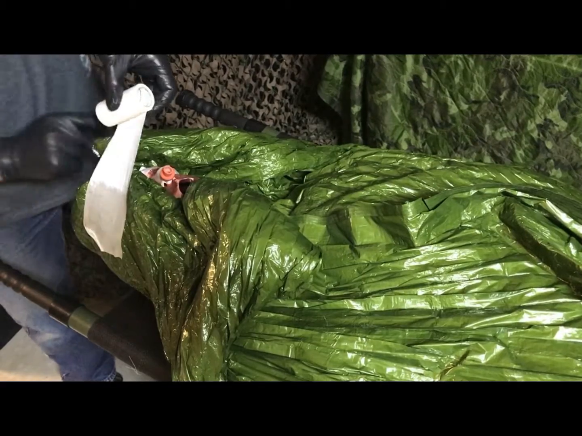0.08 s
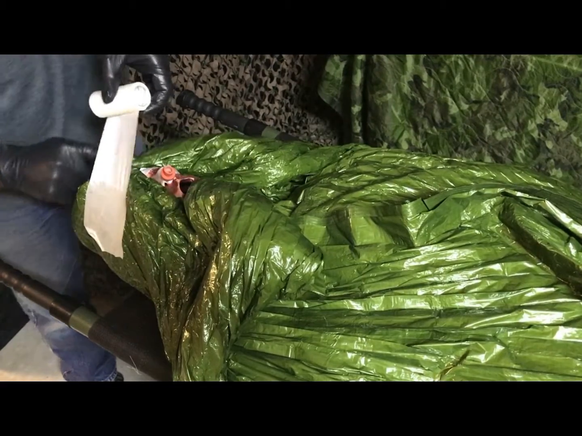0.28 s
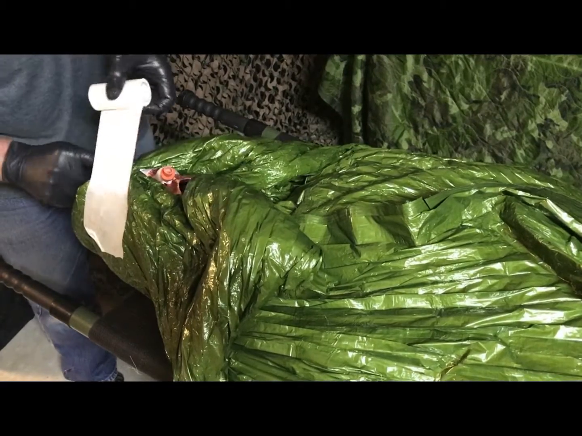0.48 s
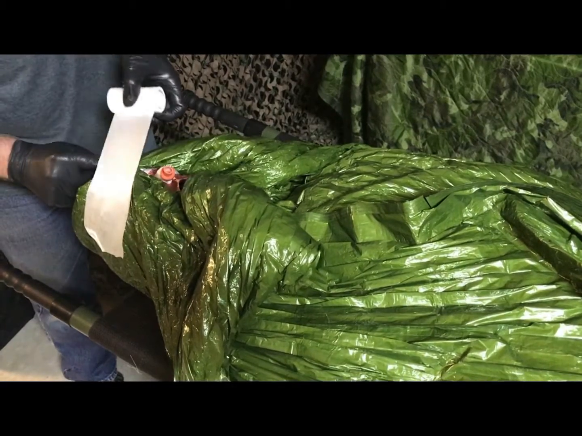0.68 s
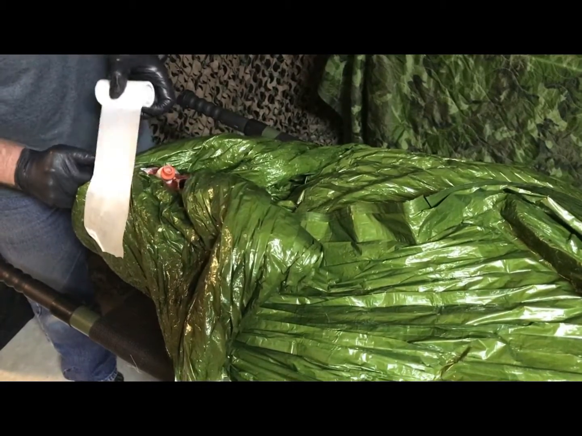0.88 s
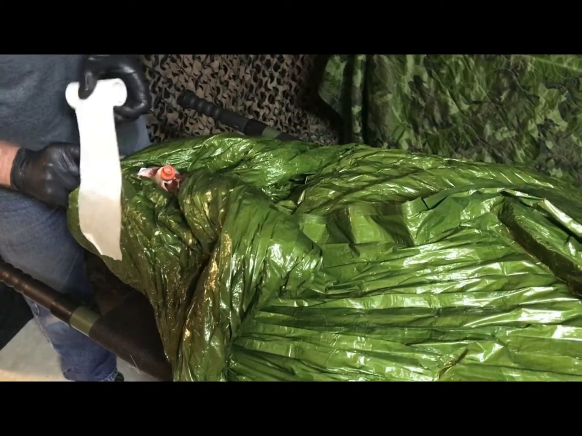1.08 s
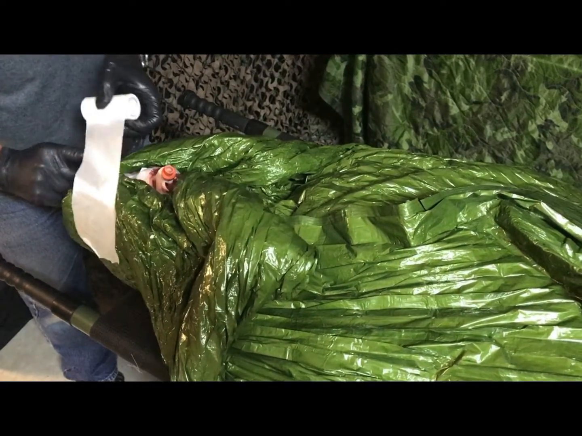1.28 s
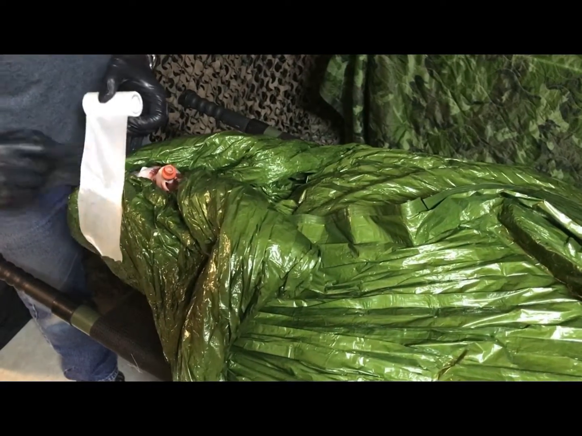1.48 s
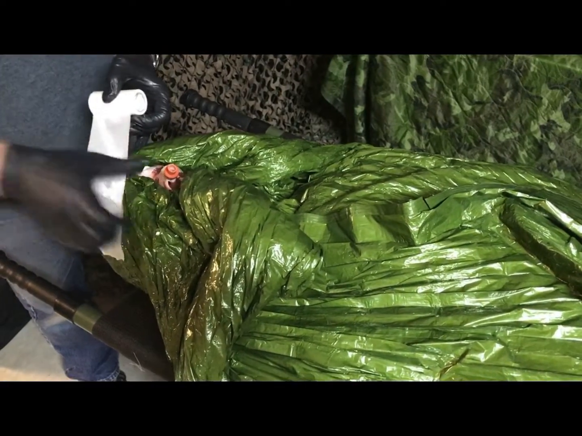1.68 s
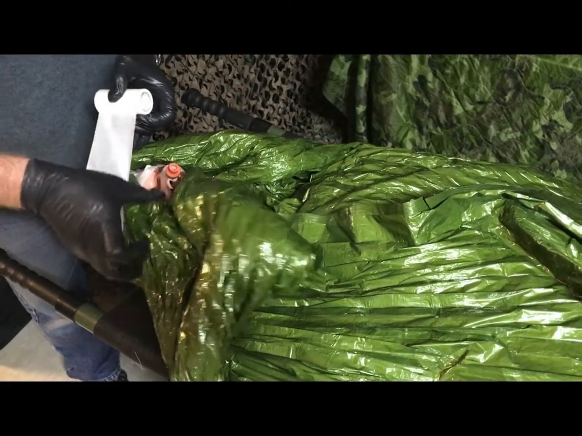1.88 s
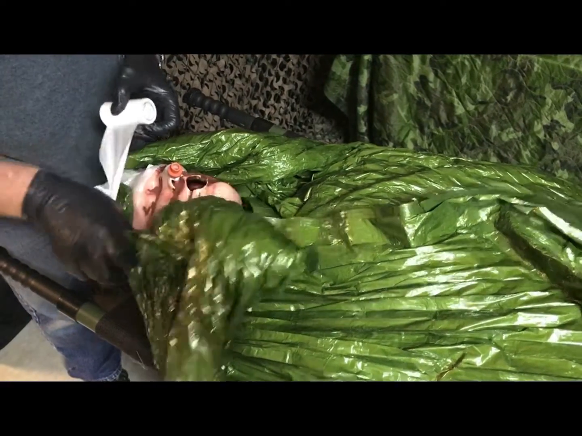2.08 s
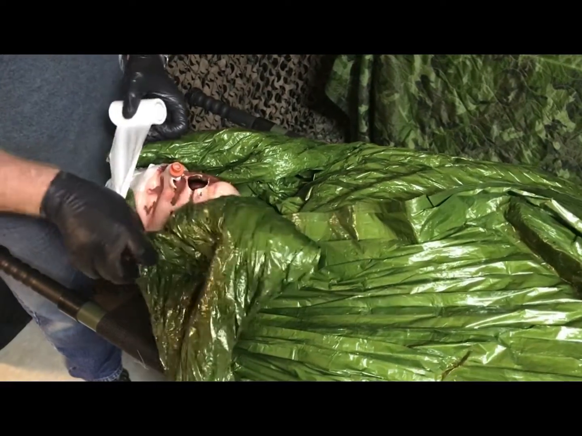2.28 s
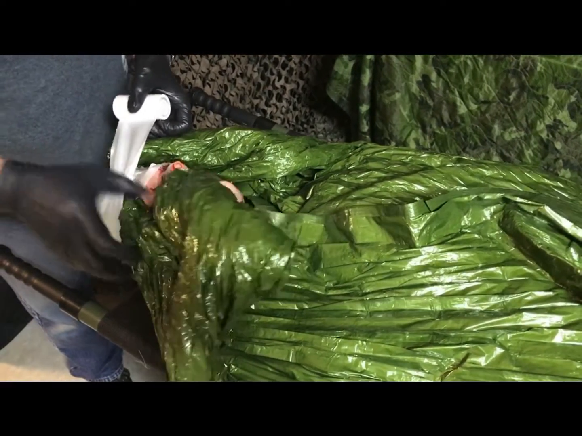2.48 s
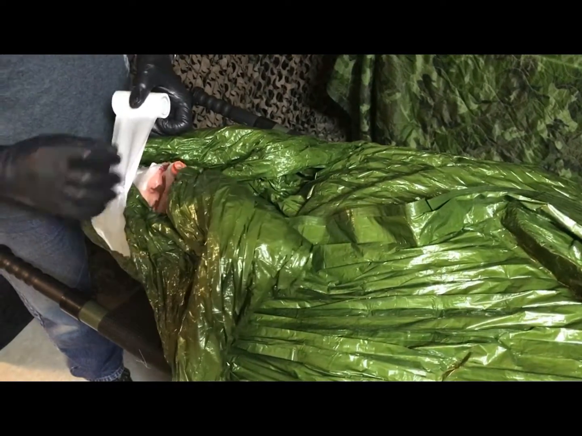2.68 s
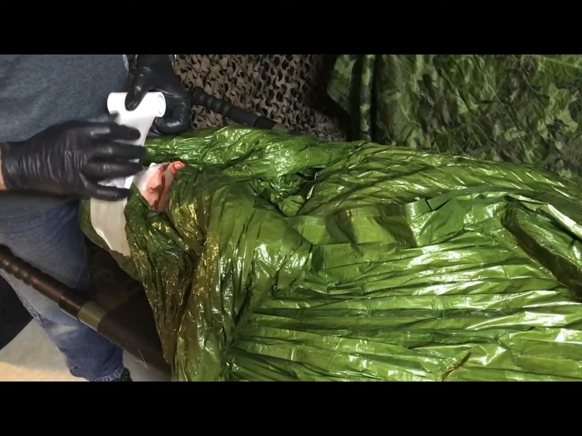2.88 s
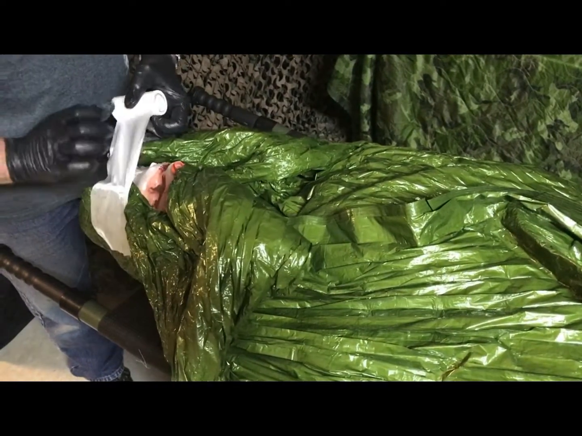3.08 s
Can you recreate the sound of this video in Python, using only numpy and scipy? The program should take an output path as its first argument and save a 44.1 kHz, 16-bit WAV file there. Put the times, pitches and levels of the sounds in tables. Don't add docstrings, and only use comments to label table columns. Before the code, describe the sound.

Crinkling foil-like plastic blanket, tugged with sharp ticks and dull pops, then peeled back loudly.

```python
import sys
import numpy as np
from scipy import signal
from scipy.io import wavfile
from scipy.ndimage import uniform_filter1d

SR = 44100
rng = np.random.default_rng(int(sys.argv[2]) if len(sys.argv) > 2 else 0)


def voltage_ratio(level):
    return 10 ** (np.asarray(level, float) / 20)


def materialize(psi):
    bounded = np.clip(np.atleast_2d(psi).T, -1, 1)
    quanta = np.round(bounded * 32767).astype(np.int16)
    wavfile.write(sys.argv[1], SR, quanta)


N = 138915

# peak_s, swell_s_per_10db, fade_s_per_10db, effort_db, large_fold_weight_db
TUG_EVENTS = [
    (.02, 3.5, 0.2, -53, -2),
    (.22, 0.0236, 0.0262, -32, -6.5),
    (.29, 0.07, 0.13, -36, -4.5),
    (.355, 0, 0.02, -35.5, 0.5),
    (.6, 0.165, 0.32, -36, -6),
    (.772, 0.05, 0.02, -37, -2.5),
    (1.0, 0.08, 0.1, -48, 5),
    (1.22, 0.08, 0.07, -39, 3),
    (1.52, 0.38, 0.04, -44.5, 2),
    (1.62, .1, 0.8, -52, -2),
]
# start_s, fade_s_per_10db, effort_db, large_fold_weight_db
JERK_EVENTS = [
    (.79, .1, -40, 4),
    (.812, .1, -40, 16),
    (1.062, .11, -43, 7),
    (1.14, .2, -39, 4),
    (1.293, .12, -39, 6),
    (1.442, .045, -38, 4),
    (1.637, .03, -47, -3),
    (2.855, .045, -45, 6),
]
# peak_s, swell_s_per_10db, fade_s_per_10db, effort_db, large_fold_weight_db
PEEL_EVENTS = [(1.798, 0.01, 0.7, -35.5, -5), (1.9, 0.05, 0.03, -31, -1.5),
               (2.06, 0.0715, 0.04, -24.5, -4.5), (2.195, 0.0624, 0.05, -28, -3.5),
               (2.265, 0.075, 0.08, -29, -4.5), (2.405, 0.1164, 0.16, -30.5, -3),
               (2.54, 0.09, -0.09, -33, -2.5), (2.598, 0.04, 0.01, -38, 2), (2.63, 0.12, 0.25, -44, -5),
               (2.79, 0.05, 0.35, -42.5, -11), (2.97, 0.05, 0.3, -45, -4)]
# start_s, peak_db, pitch_hz
CREASE_TICKS = [(.019, -30.5, 5850), (0.03, -31, 5940), (0.0483, -26, 13700), (0.133, -28, 11200),
                (0.162, -29, 7440), (0.2149, -18, 6460), (0.22, -17, 6620), (0.3357, -16, 5570),
                (.4127, -31, 12200), (.4382, -32, 11000), (.77, -18, 13300), (1.022, -28, 8130),
                (1.4187, -27, 8460), (1.6356, -26, 6430), (1.7966, -29, 12200), (1.8149, -18.5, 7230),
                (1.831, -17, 8000), (1.881, -17, 6960), (1.9367, -16.5, 6130), (2.2546, -15, 13500),
                (2.301, -18, 13500), (2.5885, -10, 7160), (2.594, -9, 6000), (2.7465, -18, 6500),
                (2.876, -19, 7500), (2.807, -27, 6500), (0.5, -33, 6970), (.7231, -21, 9140),
                (1.0376, -35, 7950), (1.521, -33, 13500), (1.5375, -31, 13100), (1.566, -37, 12500),
                (1.5911, -29, 7420), (1.593, -36, 13200), (1.63, -42, 12900), (1.673, -32.5, 9170),
                (1.681, -38, 12900), (1.6954, -36, 6540), (1.7118, -35, 5600), (1.7135, -41, 13000),
                (1.7595, -37, 11600), (1.7821, -43, 5500), (1.8608, -19.5, 6860), (1.9415, -16, 7500),
                (1.957, -16, 7900), (2.001, -17, 6850), (2.016, -14, 7640), (2.116, -15, 7540),
                (2.305, -18, 8050), (2.4001, -17.5, 6400)]
# start_s, peak_db, pitch_hz, tick_db
FOLD_POPS = [(0.131, -31, 970, -18), (0.163, -33, 2100, -3), (0.334, -22.5, 1480, -6),
             (0.788, -17.5, 1300, 2), (0.801, -16.5, 1250, -7), (0.808, -9, 1890, -4.5),
             (0.826, -5.5, 710, -7.5), (0.843, -9, 910, -7), (0.861, -6, 1344, -10.5),
             (0.886, -11, 880, -9.5), (0.929, -20.5, 1420, -20), (1.0548, -13.5, 1000, -8),
             (1.137, -17.5, 990, -9), (1.342, -20.5, 1210, -1), (1.357, -19, 1170, -5),
             (1.81, -21.5, 1530, -7), (2.196, -16.5, 2180, -10), (2.361, -18, 1070, -18),
             (2.387, -14, 1120, -6), (2.552, -17.5, 2200, -5), (2.58, -15, 1400, -6),
             (2.588, -16.5, 830, -1), (2.591, -15.5, 2140, -7), (2.764, -30.5, 2030, -2),
             (2.835, -15, 900, -10), (2.851, -17.5, 950, -10), (2.858, -19, 900, -8),
             (2.927, -31.5, 720, 3), (.558, -28, 2000, -8), (.5754, -26.5, 2510, -12),
             (.7225, -21.5, 2960, -5), (.8675, -24, 1300, -20), (.875, -15, 1280, -24),
             (1.0217, -31, 2130, -8), (1.0382, -30, 2400, -13), (1.068, -29, 1090, -20),
             (1.851, -25, 1970, -14), (1.872, -22, 1950, -4), (1.939, -16, 1050, -8),
             (2.014, -19, 2180, -6), (2.033, -14.5, 1190, -12), (2.04, -11.5, 1080, -12),
             (2.066, -16, 1450, -12), (2.192, -17, 2170, -6), (2.266, -22.5, 1680, -4),
             (2.325, -23, 1260, -11), (2.332, -23, 1270, -8), (2.366, -21, 1140, -17)]
# start_s, peak_db, pitch_hz, tick_db
WRAP_SLIPS = [(1.155, -21, 1110, -7), (1.291, -18, 1100, -7), (1.2959, -24, 1170, -7),
              (1.299, -26, 1190, -4), (1.3049, -19, 1150, -3.5), (1.31, -20, 1210, -5),
              (1.3141, -22, 1200, -4), (1.3201, -20, 1190, -5), (1.329, -20.5, 1120, -0.5),
              (1.439, -18.5, 1300, -3.5), (1.444, -22, 1240, 0), (1.447, -17.5, 1470, -5),
              (1.451, -18.5, 1350, -7)]
# start_s, peak_db, pitch_hz, t60_s
BODY_THUDS = [(0.342, -32, 141, 0.089), (0.811, -27, 181, 0.32), (1.056, -32, 208, 0.083),
              (1.14, -30.5, 153, 0.12), (1.295, -29.5, 166.6, 0.42), (1.3, -29, 419, 0.18),
              (2.196, -27.5, 243, 0.067), (2.39, -30.5, 183, 0.13), (2.591, -30, 135, 0.12),
              (2.2, -31, 130, .1), (2.33, -31, 292, 0.09), (2.837, -31, 480, 0.1)]
# start_s, length_s, slips_per_s, level_db, body_pitch_hz
SHEET_CREAKS = [
    (1.163, 0.064, 150, -23.5, 1190),
    (1.455, 0.016, 430, -18.5, 1370),
    (1.898, 0.0252, 300, -18.5, 1086),
    (2.046, 0.022, 180, -16, 1096),
]
# freq_hz, density_db_per_hz
TICK_SPECTRUM = [(150, -37), (600, -16.5), (1800, -4.5), (3000, -4.5), (4500, -5.5), (6500, 1.5),
                 (12000, 0), (16000, -1.5)]
# freq_hz, density_db_per_hz
LOOSE_FOLD_SPECTRUM = [(60, -17), (150, -8.5), (450, -9), (700, -1.5), (1200, -1), (2200, -4.5), (3500, -9),
                       (8000, -41)]
# freq_hz, density_db_per_hz
PRESSED_FOLD_SPECTRUM = [(60, -18.5), (150, -7), (450, -7), (700, -2.5), (1300, -1), (2000, -3.5),
                         (3000, -13), (8000, -52)]
# freq_hz, density_db_per_hz
AIR_SPECTRUM = [(20, -22), (40, 4), (80, 5.5), (150, -3), (400, -15.5), (1500, -14), (6000, -19.5),
                (16000, -28.5)]
# freq_hz, t60_s
ROOM_DECAY = [(150, 0.19), (700, 0.35), (2000, 0.21), (6000, 0.15), (14000, 0.12)]
# freq_hz, gain_db
MIC_RESPONSE = [(25, -11.5), (100, -6), (3200, 2), (4400, 1.5), (6800, 0), (9000, -1), (10500, -5),
                (12800, 3)]

TICKS_PER_S, TICK_SPREAD_DB, TICK_DB = 7000, 3, 2.5
FOLDS_PER_S, FOLD_SPREAD_DB, FOLD_DB = 900, 3.5, -0.96
CLUMP_DB, DENSER_PER_DB = 1.42, 0.06
TICK_T60_S, TICK_RISE_S = 0.0042, 0.00074
POP_T60_S, POP_RISE_S, POP_LAG_S = 0.0092, 0.00062, 0.001211
POP_FALL_RATIO, POP_FALL_S = 0.93, 0.001
EDGE_SHARE, EDGE_RING_HZ, EDGE_T60_S = 0.4, 2050, 0.005
AIR_DB, ROOM_DB = -50.5, -7.5
BAND_EDGE_HZ = 15800


def evened(x):
    return x / np.sqrt(np.mean(x ** 2) + 1e-20)


def steadied(x):
    return x / np.sqrt(uniform_filter1d(x ** 2, 2600) + 1e-12)


def read(points, hz):
    table_hz, value = np.transpose(points)
    return np.interp(np.log(hz + 1), np.log(table_hz + 1), value)


def add(mix, start_s, sound):
    part = mix[round(start_s * SR):][:len(sound)]
    part += sound[:len(part)]


def coloured(x, points):
    half = np.log(voltage_ratio(read(points, np.fft.rfftfreq(4096, 1 / SR))))
    log_gain = np.concatenate([half, half[-2:0:-1]])
    taps = np.fft.ifft(np.exp(np.conj(signal.hilbert(log_gain)))).real[:2048]
    return signal.oaconvolve(x, taps)[:len(x)]


def room_air():
    return voltage_ratio(AIR_DB) * evened(coloured(rng.standard_normal(N), AIR_SPECTRUM))


def grains(per_s, spread_db, low_hz, high_hz, cycles, count=24):
    clump = voltage_ratio(CLUMP_DB * evened(uniform_filter1d(rng.standard_normal(N), 500)))
    draw = rng.random((N, 3))
    size = voltage_ratio(spread_db * np.minimum(-np.log(draw[:, 0] + 1e-9), 4))
    size = size * (draw[:, 1] < per_s / SR) * clump
    patch = (draw[:, 2] * count).astype(int)
    out, t = np.zeros(N), np.arange(400) / SR
    for k, hz in enumerate(np.geomspace(low_hz, high_hz, count)):
        ring = np.exp(-t * hz / cycles) * np.sin(2 * np.pi * (hz * t + rng.random()))
        out += signal.oaconvolve(size * (patch == k), ring / np.linalg.norm(ring))[:N]
    return out


def crinkle():
    jerks = np.insert(JERK_EVENTS, [1], 0, axis=1)
    events = np.vstack([TUG_EVENTS, jerks, PEEL_EVENTS])
    peak_s, swell_s, fade_s, effort_db, weight_db = events.T[:, :, None]
    t, coarse_t = np.arange(N) / SR, np.arange(0, N + 64, 32) / SR
    late_s = coarse_t - peak_s
    swell_s = np.where(swell_s < 0.02, SR ** -0.55, swell_s)
    tens_of_db = np.where(late_s < 0, -late_s / swell_s, late_s / np.maximum(fade_s, 0.005))
    power = voltage_ratio(effort_db - 10 * tens_of_db) ** 2
    effort = np.interp(t, coarse_t, np.sqrt(power.sum(0)))
    weighted = power * voltage_ratio(weight_db) ** 2
    groups = np.split(weighted, [len(TUG_EVENTS) + len(JERK_EVENTS)])
    tugged, peeled = (np.interp(t, coarse_t, np.sqrt(group.sum(0))) for group in groups)

    crowd = np.exp(DENSER_PER_DB * (20 * np.log10(effort + 1e-9) + 38))
    creases = grains(TICKS_PER_S * crowd, TICK_SPREAD_DB, 944, 15340, 0.96)
    ticks = steadied(coloured(creases, TICK_SPECTRUM))
    buckles = grains(FOLDS_PER_S * crowd, FOLD_SPREAD_DB, 125.6, 3380, 1.54)
    pressed = tugged * steadied(coloured(buckles, PRESSED_FOLD_SPECTRUM))
    loose = peeled * steadied(coloured(buckles, LOOSE_FOLD_SPECTRUM))
    return voltage_ratio(TICK_DB) * effort * ticks + voltage_ratio(FOLD_DB) * (pressed + loose)


def tick(db, hz, noise, pitched=0.93):
    t = np.arange(len(noise)) / SR
    wide = uniform_filter1d(noise, size=2) - uniform_filter1d(noise, size=6)
    near = (1.27 + evened(uniform_filter1d(noise, size=9))) * np.sin(2 * np.pi * hz * t)
    burst = (wide + pitched * near) * voltage_ratio(-60 * t / TICK_T60_S) * np.minimum(t / TICK_RISE_S, 1)
    return voltage_ratio(db) * burst / abs(burst).max()


def pop(db, hz, tick_db, noise):
    t = np.arange(len(noise)) / SR
    turns = np.cumsum(hz * (0.766 + POP_FALL_RATIO * np.exp(-t / POP_FALL_S))) / SR
    rough = evened(uniform_filter1d(noise, size=13) - uniform_filter1d(noise, size=90))
    ring = np.sin(2 * np.pi * turns) + 0.49 * rough
    ring = ring * voltage_ratio(-60 * t / POP_T60_S) * (1 - np.exp(-t / POP_RISE_S))
    edge = np.sin(2 * np.pi * EDGE_RING_HZ * t) * voltage_ratio(-60 * t / EDGE_T60_S) * np.minimum(t / 0.0003, 1)
    ring = ring + EDGE_SHARE * edge
    flip = tick(db + tick_db + 3.5, 6930, noise[::-1], pitched=0.41)
    return voltage_ratio(db) * ring / abs(ring).max() + flip


def thud(db, hz, t60_s, noise):
    t = np.arange(len(noise)) / SR
    band = signal.butter(1, [0.65 * hz, 1.76 * hz], "bandpass", fs=SR, output="sos")
    lumpy = evened(signal.sosfilt(band, noise))
    ring = lumpy + 0.83 * np.sin(2 * np.pi * hz * t)
    return voltage_ratio(db - 60 * t / t60_s) * ring * np.minimum(t / 0.0018, 1)


def creak(mix, start_s, length_s, per_s, db, hz):
    draw = rng.random((40, 3))
    slip_times_s = np.cumsum(np.r_[0, 0.75 + 0.55 * draw[:-1, 0]]) / per_s
    for s, d, noise in zip(slip_times_s, draw, rng.standard_normal((40, 600))):
        if s < length_s:
            slip_db = db - 4 * d[1] - 3 * s / length_s
            add(mix, start_s + s, pop(slip_db, hz * (0.8 + 0.33 * d[2]), -6.5, noise))


def room(x, count=4):
    out, t = np.zeros(N), np.arange(N) / SR
    for k in range(count):
        taps = np.zeros(SR // 2)
        at = np.arange(120, len(taps) - 20, 20)
        taps[at + rng.integers(0, 20, len(at))] = rng.choice([-1., 1.], len(at))
        hz, s, z = signal.stft(taps, SR, nperseg=256)
        decay = voltage_ratio(-60 * s / read(ROOM_DECAY, hz)[:, None])
        tail = signal.istft(z * decay, SR, nperseg=256)[1]
        spot = np.maximum(np.cos(2 * np.pi * (23 * t - k / count)), 0)
        out += signal.fftconvolve(x * spot, tail / np.linalg.norm(tail))[:N]
    return out


def scene():
    air = room_air()
    sheet = crinkle()
    for s, db, hz in CREASE_TICKS:
        add(sheet, s, tick(db + 1.0, hz, rng.standard_normal(300)))
    for s, db, hz, tick_db in list(FOLD_POPS) + list(WRAP_SLIPS):
        add(sheet, s + POP_LAG_S, pop(db, hz, tick_db, rng.standard_normal(900)))
    for s, db, hz, t60_s in BODY_THUDS:
        add(sheet, s, thud(db, hz, max(t60_s, 0.03), rng.standard_normal(12000)))
    for row in SHEET_CREAKS:
        creak(sheet, *row)
    return (sheet + voltage_ratio(ROOM_DB) * room(sheet) + air)[None]


def band_limit(x):
    return signal.sosfilt(signal.butter(12, 17000, fs=SR, output="sos"), x)


def record(dry):
    x = coloured(dry[0], MIC_RESPONSE)
    low_pass = signal.firwin(1023, BAND_EDGE_HZ, window=("kaiser", 2.5), fs=SR)
    mix = signal.oaconvolve(x, low_pass, "same")[None]
    return band_limit(mix)


dry = scene()
out = record(dry)
materialize(out)
```